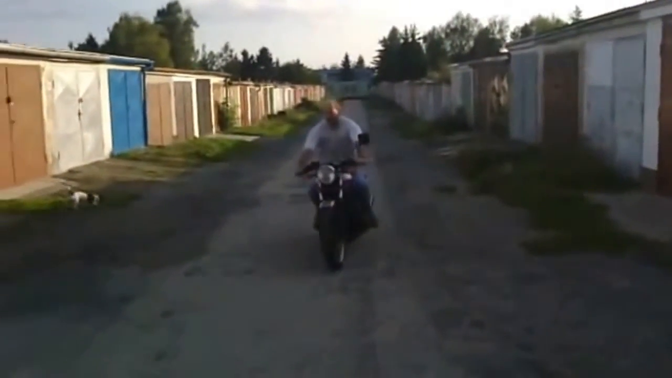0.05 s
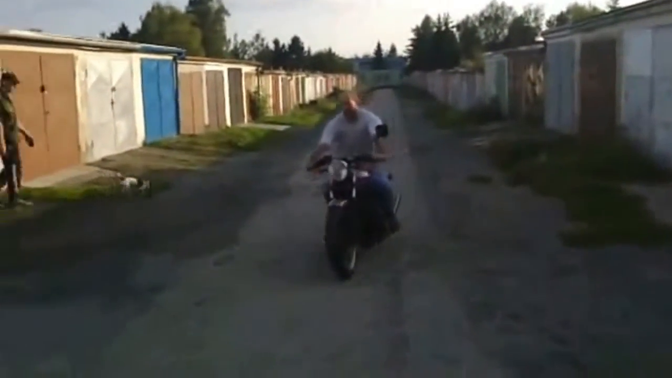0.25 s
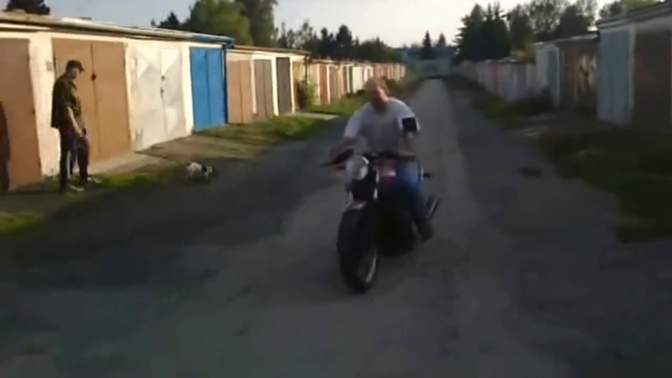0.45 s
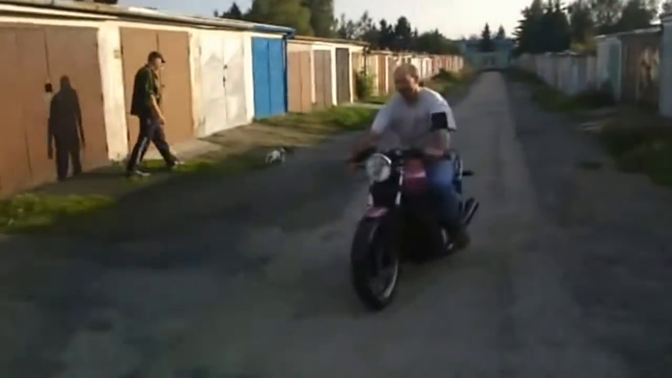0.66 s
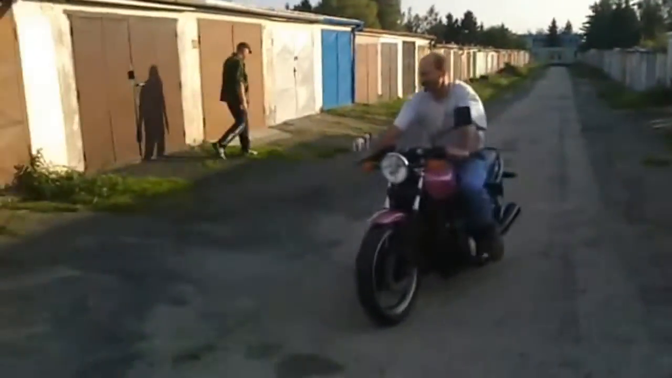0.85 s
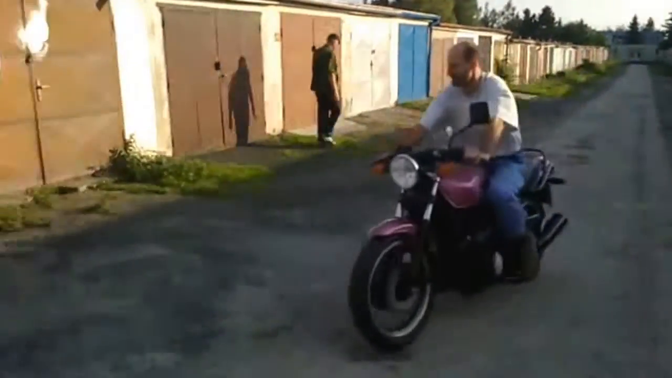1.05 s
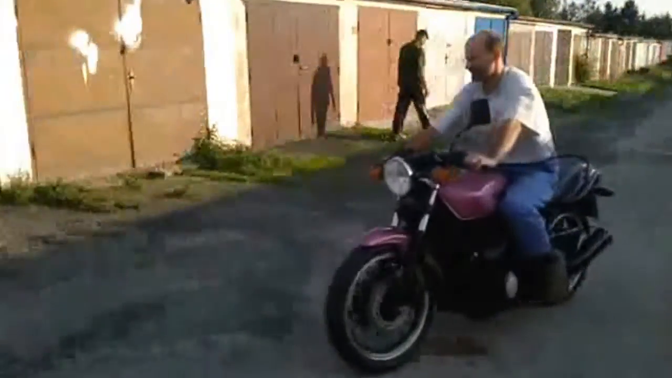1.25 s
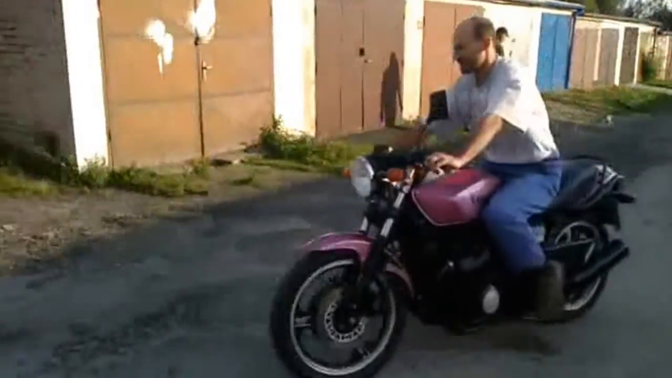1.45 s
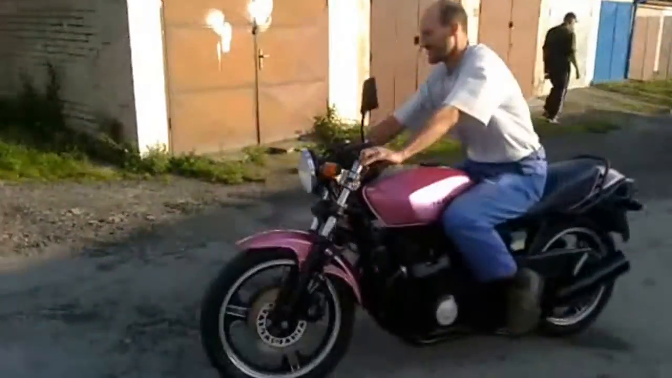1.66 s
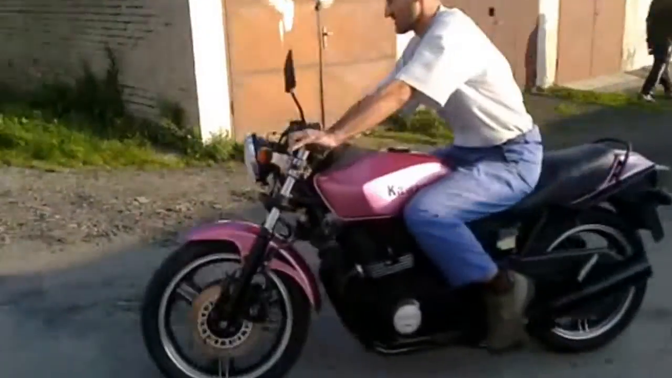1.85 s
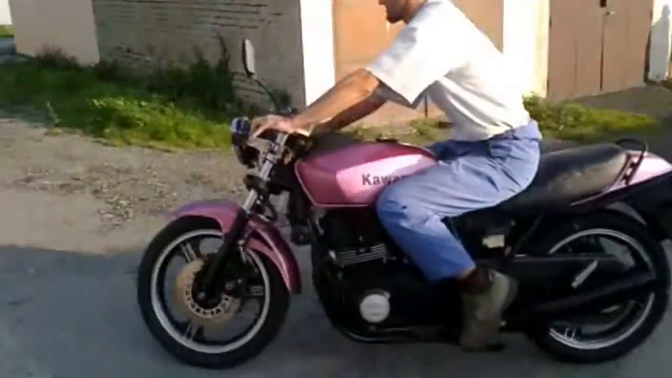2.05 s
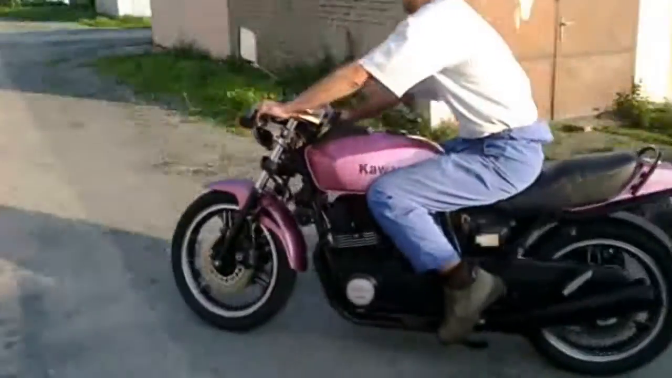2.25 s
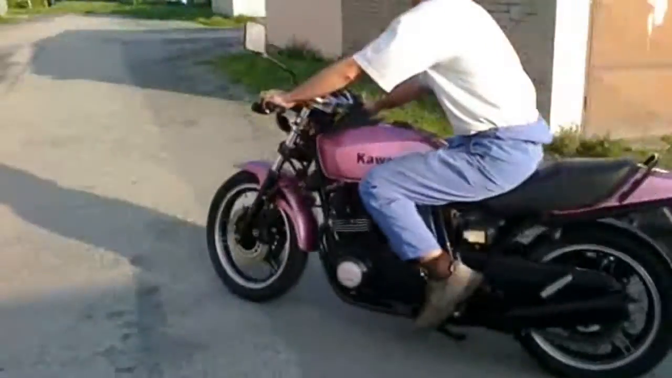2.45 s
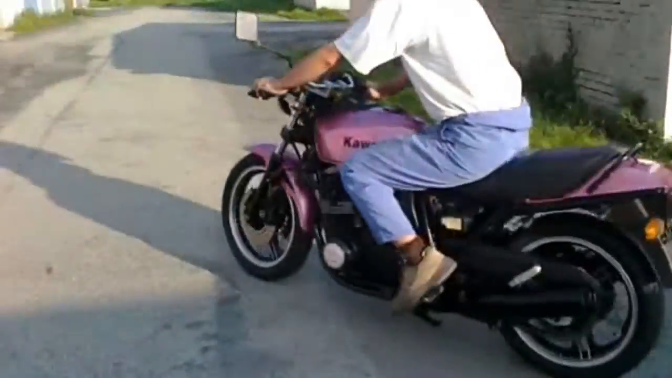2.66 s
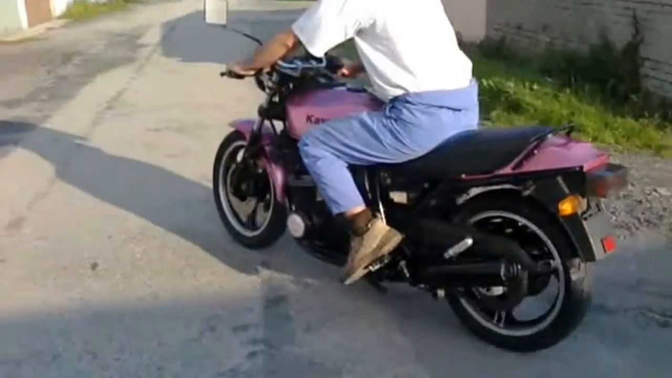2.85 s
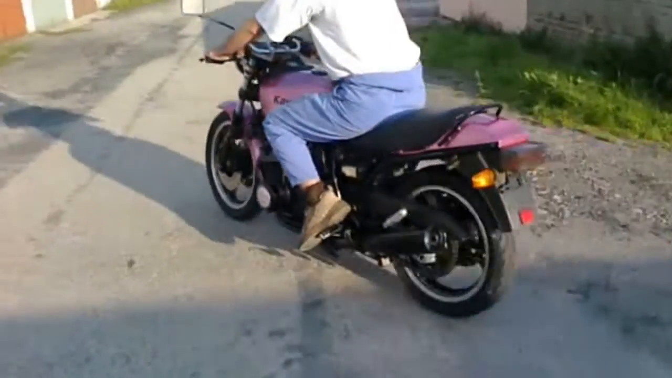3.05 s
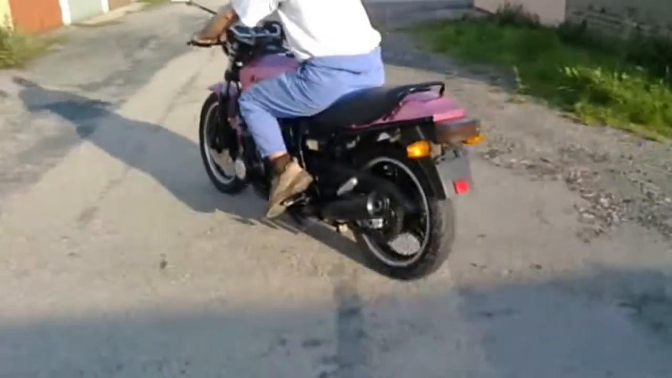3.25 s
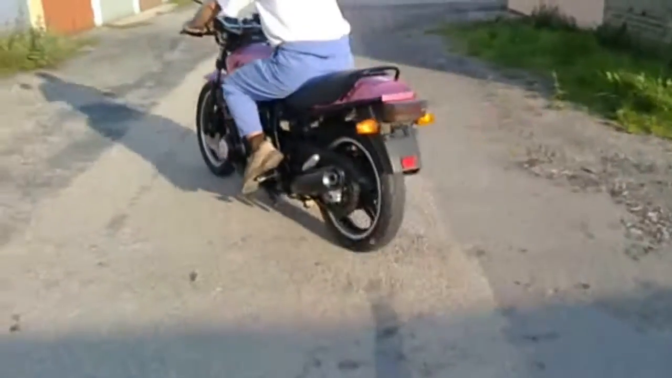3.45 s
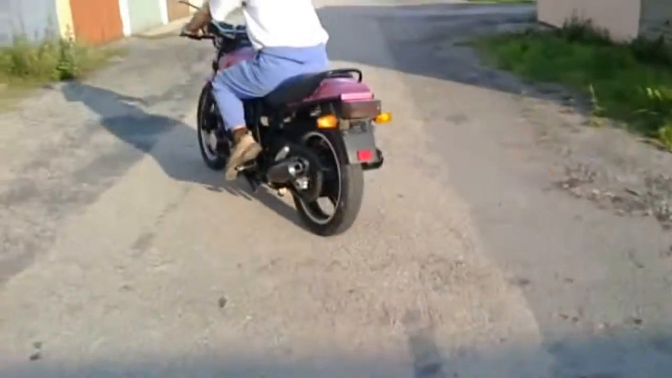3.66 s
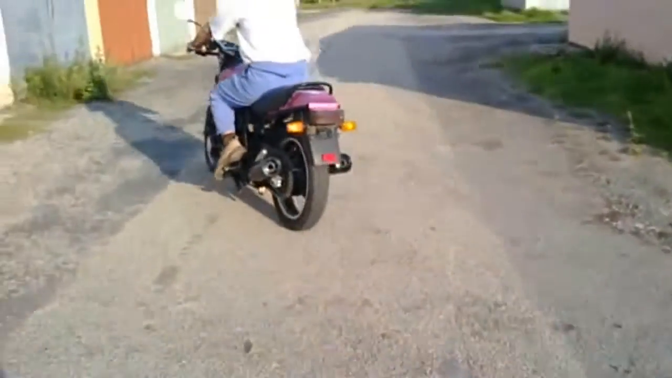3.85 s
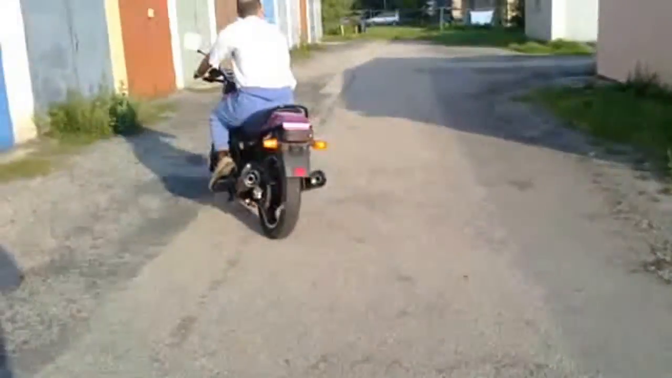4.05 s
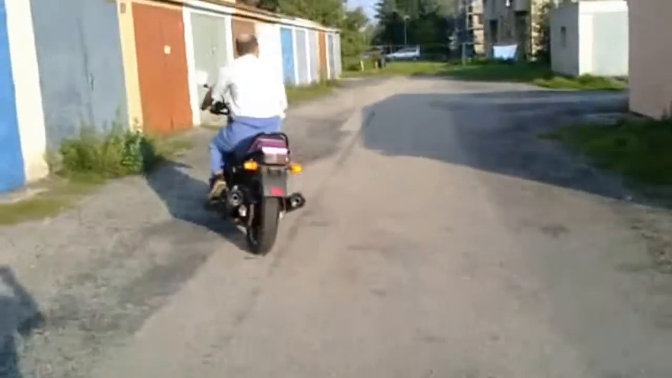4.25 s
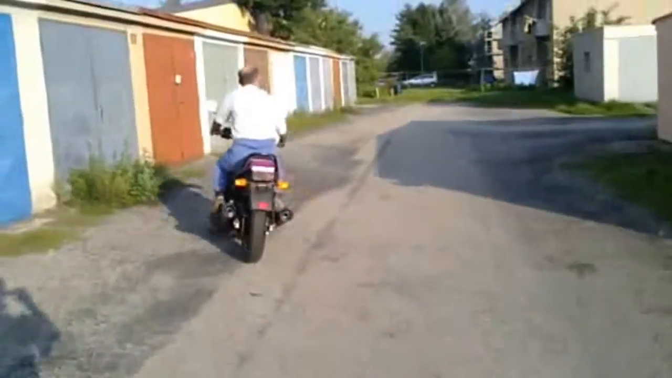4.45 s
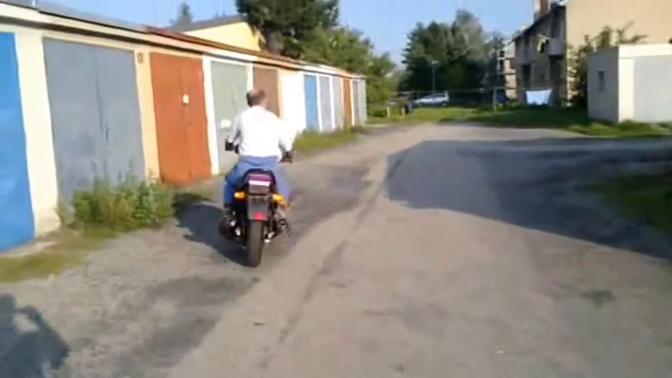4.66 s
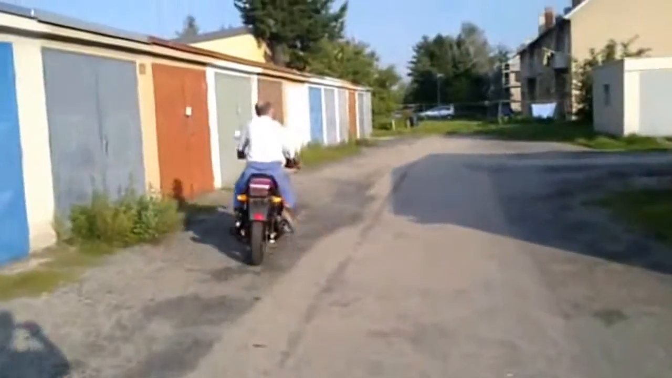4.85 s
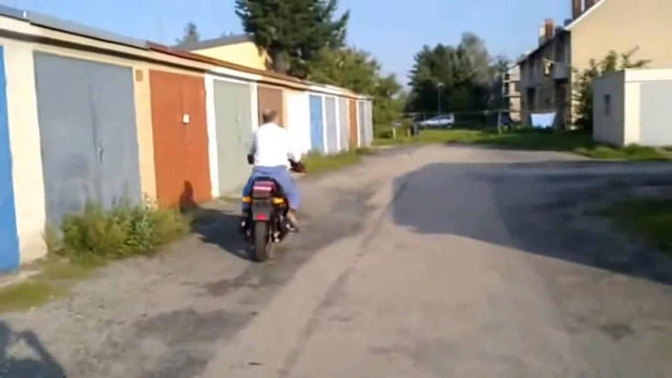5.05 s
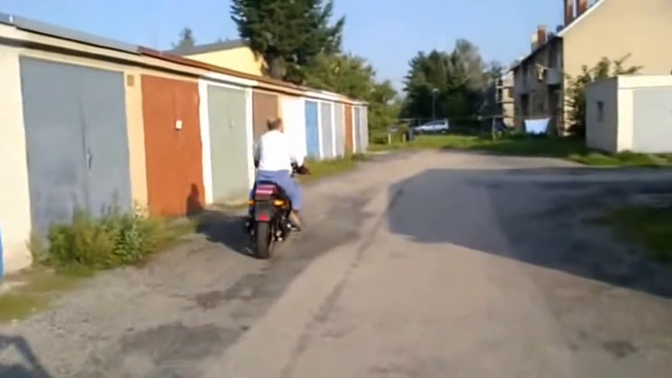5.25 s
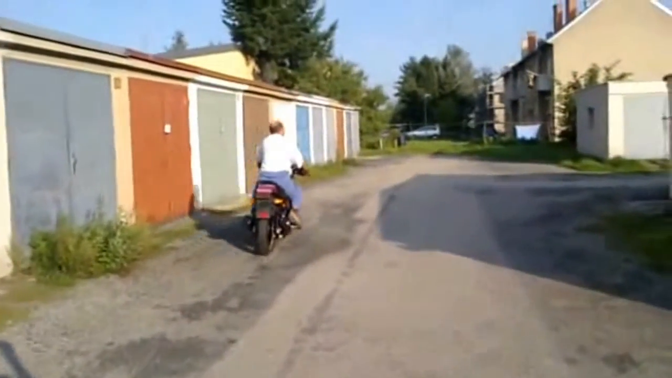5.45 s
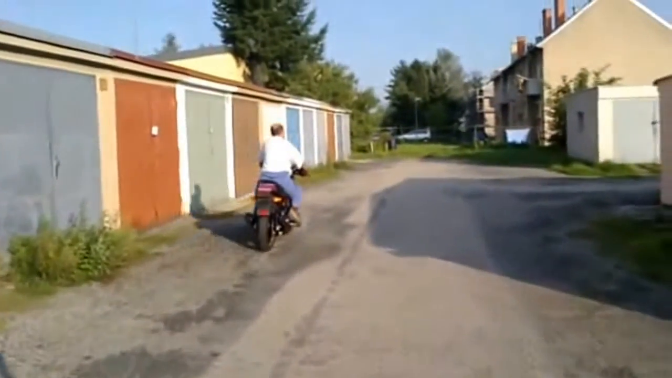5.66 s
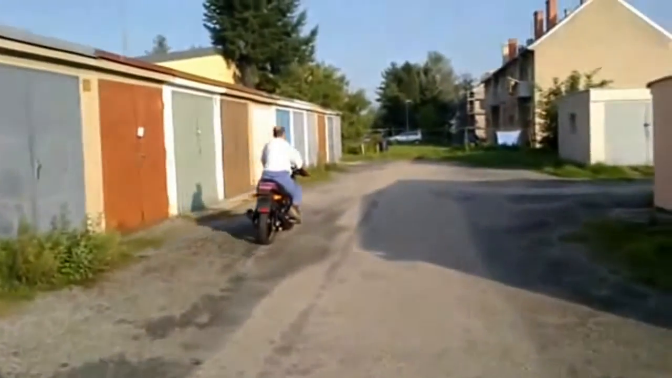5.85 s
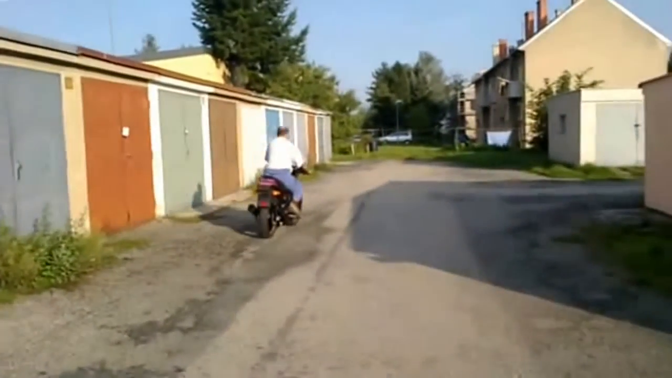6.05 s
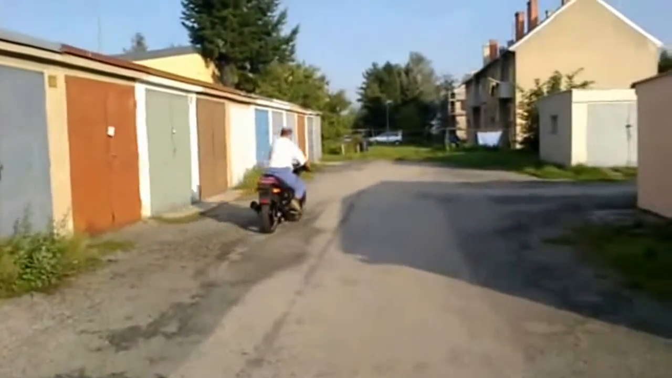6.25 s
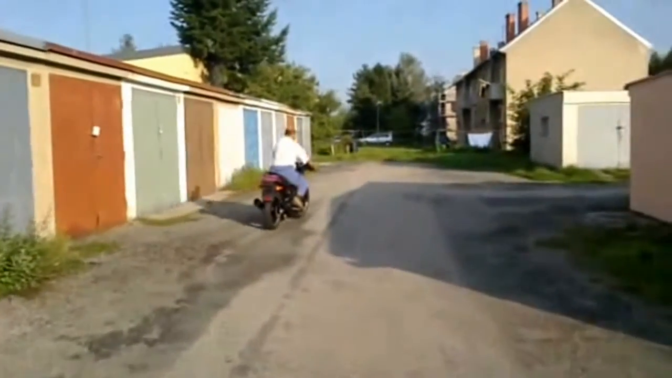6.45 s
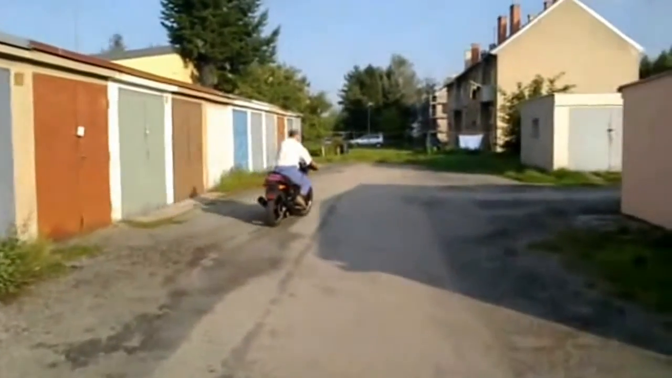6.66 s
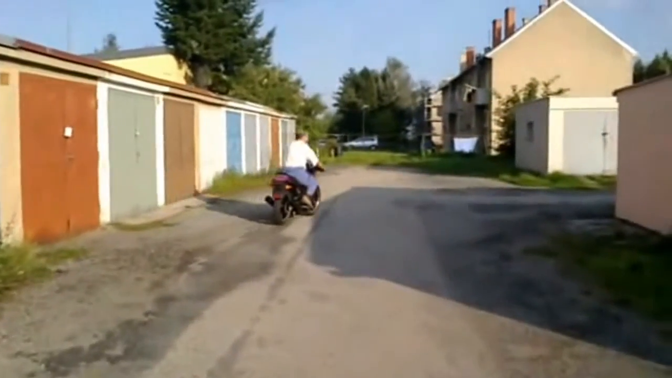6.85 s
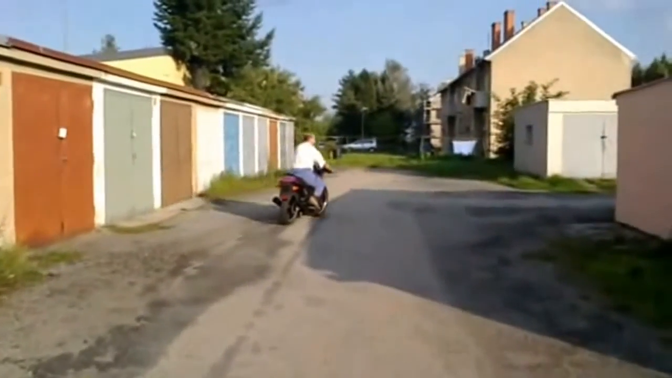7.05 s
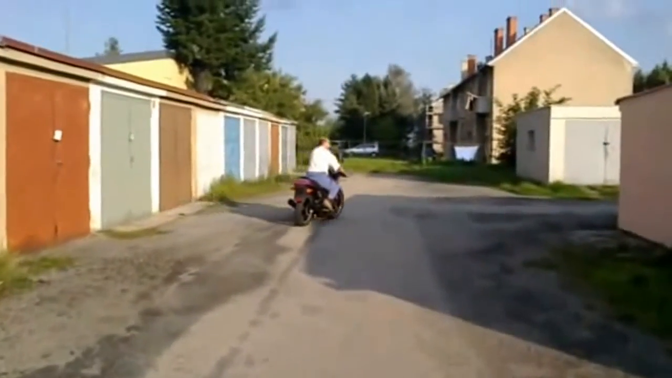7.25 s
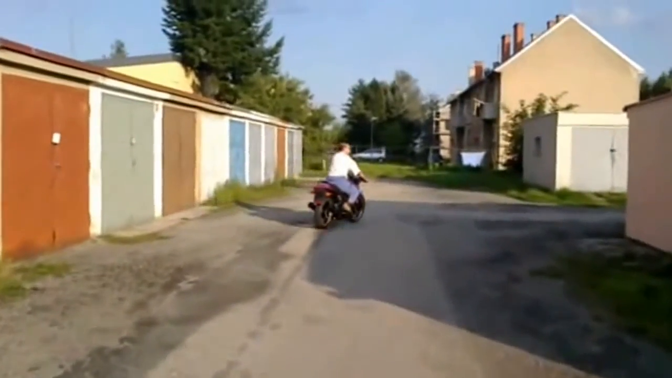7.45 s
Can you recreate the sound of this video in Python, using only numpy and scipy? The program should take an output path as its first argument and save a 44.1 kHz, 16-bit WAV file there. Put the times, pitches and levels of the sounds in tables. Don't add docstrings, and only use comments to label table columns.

```python
import sys
import numpy as np
from scipy import signal
from scipy.io import wavfile
from scipy.ndimage import uniform_filter1d

SR = 44100
rng = np.random.default_rng(int(sys.argv[2]) if len(sys.argv) > 2 else 0)


def file_out(sig):
    cols = np.atleast_2d(sig).T
    lim = np.clip(cols, -1, 1)
    pcm = np.round(lim * 32767).astype(np.int16)
    wavfile.write(sys.argv[1], SR, pcm)


def decibels_to_gain(level_db):
    exponent = np.asarray(level_db, float) / 20
    return 10 ** exponent


N = 331191

# frequency in Hz, level in dB per Hz.
AIR_SPECTRUM = [(160, -33), (280, 11), (413, -25), (1030, -31), (2050, -21), (3230, -12), (4600, -24),
                (9330, -25.5), (15700, -45)]
# time in seconds, level in dB, width in seconds.
CRUNCHES = [(.51, -33.5, 0.039), (1.2, -35, 0.011), (1.27, -40, 0.084), (1.392, -27, 0.011),
            (4.57, -56, 0.038), (4.71, -40.5, 0.037), (4.77, -30, 0.016), (4.94, -38.5, 0.0095),
            (5.01, -45, 0.036), (5.08, -42.5, 0.021), (5.25, -43.5, 0.066), (5.43, -48, 0.019),
            (5.581, -39, 0.022), (5.649, -49, 0.044), (5.82, -35, 0.02), (5.87, -45.5, 0.029),
            (6.3, -38, 0.056), (6.49, -52, .03), (6.7, -55.5, 0.028), (7.4, -58, 0.018)]
# frequency in Hz, level in dB per Hz.
GRIT_SPECTRUM = [(600, -23), (1200, 3.5), (2400, 3), (3600, 5), (5200, 3.5), (8000, -9), (10500, -22),
                 (15700, -37)]
# time in seconds, peak in dB, pitch in Hz.
STONE_SNAPS = [(0.228, -15, 3240), (0.9434, -16, 3754), (1.2692, -9, 1780), (2.8802, -21.5, 2470),
               (3.411, -18, 2280), (4.3674, -24, 3266), (5.0892, -22, 2920), (5.5655, -26, 4230),
               (5.8047, -24, 3500), (5.815, -19, 3132), (5.824, -19, 2620), (5.838, -27, 2514),
               (5.847, -9, 3400), (5.8478, -12.5, 1490), (5.856, -20, 1887), (5.8699, -34, 2346),
               (5.896, -21, 1590), (6.0204, -20, 3416), (6.2114, -35, 1502), (6.6956, -35, 2208)]
# start in seconds, end in seconds, first frequency in Hz, last frequency in Hz, lift in dB.
ECHO_BANDS = [(.5, 2.56, 990, 1420, -8), (-2, 1.7, 4060, 4300, -5), (3, 5.9, 2420, 2900, -9),
              (0.5, 2.96, 2950, 3620, 4.5), (6.6, 7.5, 7500, 7450, 4), (3, 3.2, 3600, 2830, 4),
              (0, 1.2, 5600, 6450, 2), (4.7, 2.4, 1400, 1440, -0.5), (2.5, 4.8, 4200, 4000, -7)]
# time in seconds, share of treble lost from 0 to 1.
FAR = [(0, .6), (1.2, 0), (2.55, .05), (2.8, .88), (5.7, .9), (6.1, .99), (7.51, .99)]
# time in seconds, then the dB reaching the listener
REACH = [(0, -5, -3.5, -2), (.4, 4.5, 3.5, 2), (.75, 2.5, 1.5, 4.5), (1.15, 0, 1.5, -10), (1.45, 7, 7, 7),
         (1.75, 0, 4, -13), (2.25, 1.5, 5.5, 7), (2.75, 0.5, 3, 2.5), (3, 4, 3.5, 2), (3.3, 3, 0.5, -3),
         (4.2, 0, 0, 1.5), (4.6, -5, -4, -4), (5.15, -1.5, 0.5, 4.5), (5.45, -0.5, 4, 5), (5.8, 3, -7.5, 4),
         (6.3, -0.5, -16, 4), (6.8, -2.5, -23, -4), (7.51, -2, -24, 3)]
# time in seconds, dB on the bark.
MOUTH = [(0, 12), (.2, 1.5), (.5, 12), (.7, 1.5), (1.3, 3), (1.95, 7.5), (2.3, 4.5), (2.8, -8), (3.3, -2.5),
         (4.1, 2.5), (4.6, 3.5), (5.5, -4.5), (6.1, -5), (6.3, 1.5), (6.6, 4.5), (7.1, -2.5), (7.51, 2.5)]

# time in seconds, peak in dB, pitch in Hz.
KNOCKS = [(0.5083, -3.5, 5550), (0.564, -4.5, 5200), (0.826, -9.5, 3700), (1.195, -5.5, 2540),
          (1.3778, -5, 2070), (1.4527, 1.5, 3000), (1.7469, -12, 3300), (1.965, -14, 2020),
          (2.114, -2.5, 3650), (3.0077, -4, 1614), (3.497, -11.5, 1740), (3.5784, -11, 4800),
          (3.652, -10, 1780), (3.701, -13, 5006), (3.7688, -9.5, 5530), (3.9829, -7, 5150),
          (3.8355, -18, 2026), (3.852, -11, 5300), (3.969, -8, 5290), (4.0827, -13, 3150),
          (4.3657, -13, 1730), (4.366, -8, 3290), (2.879, -11, 1510), (4.76, -7, 2460), (4.7681, -10, 4900),
          (4.4755, -17, 3582), (4.9341, -17, 2495), (5.591, -8.5, 1770), (5.645, -11.5, 1800),
          (5.875, -16, 1746), (5.0718, -13, 5384)]
# time in seconds, peak in dB,
# pitch in Hz.
TICKS = [(0.226, -30, 6800), (0.4853, -35, 6680), (0.5069, -18, 8640), (0.5632, -19.5, 8400),
         (0.7337, -31, 8160), (0.9423, -29, 7180), (1.1423, -36, 6880), (1.1792, -32, 6880),
         (1.1923, -25.5, 7000), (1.268, -27, 9680), (1.4037, -27, 7540), (1.4202, -23, 9570),
         (1.453, -21, 6560), (1.4646, -22.5, 11700), (1.5165, -27, 6890), (1.5599, -31, 14500),
         (1.6152, -38, 8370), (1.9056, -26, 6510), (1.9671, -31, 6610), (2.1151, -34, 6570),
         (2.13, -24, 6900), (2.186, -21, 9850), (2.2293, -22, 7690), (2.5864, -41, 6540),
         (2.8519, -36, 8020), (2.9098, -38, 6610), (2.9282, -30, 6700), (3.025, -23, 6500),
         (3.1086, -29, 8800), (3.1862, -40, 8800), (3.262, -29, 7030), (3.2814, -32, 7340),
         (3.3248, -27, 7580), (3.4206, -24, 7610), (3.4401, -31, 7140), (3.4615, -31, 6630),
         (3.5004, -25, 7110), (3.5783, -28, 7900), (3.6501, -25.5, 7830), (3.702, -32, 7750),
         (3.7189, -28, 7740), (3.918, -24, 7800), (4.2128, -29, 7230), (4.2966, -28, 7380),
         (4.4545, -37, 7530), (4.5271, -32, 7565), (4.7596, -24, 7365), (5.0728, -28, 7115),
         (5.3363, -27, 7350), (5.4319, -33, 6494), (5.5633, -23, 6500), (5.5779, -25, 7740),
         (5.8456, -42, 6685), (6.334, -30, 6810),
         (0.523, -22, 9010), (0.5734, -21, 6930), (0.607, -30, 6890), (0.828, -23.5, 6500),
         (4.7683, -34, 7040), (5.0076, -38, 7880), (5.015, -39, 7490), (6.9839, -51, 9580),
         (7.0243, -50, 9550), (7.1769, -51, 7170), (7.3031, -53, 9420)]
# time in
# seconds, pitch in Hz, level in dB.
SQUEALS = [
    [(1.46, 990, -51), (1.52, 990, -63), (1.6, 990, -48.5), (2.05, 1006, -49), (2.5, 960, -34.5),
     (2.56, 970, -10)],
    [(1.47, 1950, -46), (1.525, 1960, -33.5), (1.58, 1925, -52)],
    [(.52, 464, -40), (.6, 480, -30.5), (.68, 480, -51)],
    [(6.2, 3416, -41), (6.27, 3442, -39), (6.48, 3396, -47.5), (6.6, 3420, -61), (6.72, 3480, -58.5),
     (6.95, 3322, -72)],
    [(2.36, 1900, -42), (2.42, 1950, -35), (2.54, 1850, -35)],
    [(3.2, 624.4, -40), (3.45, 592, -46), (4, 868, -54), (4.28, 976, -44.5), (4.36, 961, -50)],
    [(2.9, 1570, -34.5), (3.03, 1620, -37.5), (3.3, 1680, -43), (3.7, 1800, -43.5)],
    [(2.28, 2660, -32), (2.41, 2600, -29.5), (2.46, 2590, -38)],
    [(2.34, 3600, -46), (2.4, 3580, -32), (2.47, 3522, -38)],
    [(2.14, 560.5, -39), (2.25, 658.8, -35), (2.33, 730, -41), (2.4, 704, -49)],
    [(2.56, 1780, -48), (2.62, 1589, -43), (2.69, 1320, -43)],
]
SQUEAL_WIDTHS = [49, 9, 160, 550, 200, 40, 150, 90, 90, 70, 30]
# time in seconds, pitch in Hz, level in dB.
CAM_CHAIN = [(2.8, 4596, -78), (2.95, 4600, -45), (3.1, 4680, -45), (3.6, 4830, -46), (3.75, 5150, -39.5),
             (4, 5400, -49), (4.3, 5040, -43), (4.4, 4990, -90)]
# multiple of the firing rate, dB against the clatter,
# dB per octave of engine speed.
WHINES = [(6, -17, 11), (11.5, -12, 0), (12, -10.5, 2), (14.75, -14, 0), (24, -10.5, 8)]
# frequency in Hz, level in dB per Hz.
CLATTER_SPECTRUM = [(590, -2), (1000, -4.5), (1140, -4), (1900, 6), (2210, 1), (3470, 1.5), (4020, 1),
                    (5310, 4), (8000, -11), (10400, -58), (17600, -120)]
# frequency in Hz, width in Hz, lift in dB.
CASE_RINGS = [(1780, 88, 2), (2800, 710, -0.5), (3680, 180, 3), (5150, 53, -5)]
# frequency in Hz, level in dB per Hz.
ROAR_SPECTRUM = [(180, -12.5), (300, -12), (414, -23.5), (646, -9.5), (881, -17.5), (995, -12), (1140, -17),
                 (1500, -19.5), (1950, -25), (3300, -120)]
# frequency in Hz, level in dB per Hz.
HISS_SPECTRUM = [(3530, -107), (6000, -9.5), (7890, -9.5), (9500, -9), (10900, -13), (14500, -11.5),
                 (15700, -20)]
# time in seconds, change in dB, width in seconds.
LULLS = [(.43, -4.5, 0.03), (.87, -3, 0.012), (1.1, -2, 0.046), (2.75, -3.5, 0.12), (4.62, -3.5, 0.018),
         (4.68, -7, .012), (4.87, -1, 0.027), (4.97, -0.5, .012), (5.19, -7, 0.028), (5.4, -4.5, 0.028),
         (5.54, -5.5, .012), (5.72, 2.5, 0.022), (6.12, -0.5, 0.031)]

# time in seconds, firings per second.
SPEED = [(0, 61.56), (.28, 48.7), (1.32, 37.2), (1.8, 48.14), (1.92, 52.05), (2.07, 50.97), (2.84, 39.55),
         (3.27, 52.32), (3.5, 50.45), (3.71, 58.67), (4.1, 62.7), (4.2, 59), (4.3, 66.3), (4.5, 52.2),
         (4.95, 38.88), (5.3, 37.01), (6.1, 35.43), (7.51, 37.5)]
# start in seconds, crest in seconds,
# added firings per second, fall time in seconds, bend of the rise.
BLIPS = [
    (.46, 0.647, 52.7, .27, 1.005),
    (1.33, 1.543, 39.88, .16, 1.01),
    (2.1, 2.37, 75.41, .23, 1.7),
    (6.201, 6.36, 57.06, 0.3, 0.97),
]
# opens in seconds, shuts in seconds, opening from 0 to 1.
THROTTLE = [
    (-.1, 0.009, 0.37),
    (0.471, 0.608, 0.31),
    (1.36, 1.447, 0.21),
    (1.863, 1.96, 0.24),
    (2.089, 2.384, 0.48),
    (2.884, 4.286, 0.24),
    (6.206, 6.364, 0.76),
]
# strength in dB, lateness in firings.
CYLINDERS = [(0, 0), (-2, .015), (-.7, -.012), (-3.5, .008)]
# dB at 60 firings a second,
# dB per octave of engine speed, dB added by full throttle.
LAWS = [(-26, 6, 17.5), (-35.5, 9.5, 11), (-39.5, 5.5, 10.5), (-43, 1, 9.5)]
# frequency in Hz, level in dB.
FIRST_ORDER = [(33, -39), (50, -28), (62, -25.5), (85, -21), (100, -19), (123, -17.5)]
# frequency in Hz, level in dB.
SECOND_ORDER = [(70, -19), (90, -19), (110, -15), (128, -19), (170, -29), (200, -44), (246, -9)]
# time in seconds, change in
# dB, width in seconds.
STUMBLES = [(.42, -11, 0.11), (.6, -7, 0.017), (0.725, -11, 0.017), (1.7, -4.5, 0.012), (2.485, 2, 0.0077),
            (4.68, -2, 0.025), (4.87, -6, 0.026), (5.42, -3, 0.032), (6.63, -3.5, 0.021), (6.86, -5, 0.022),
            (1.55, -7, 0.027), (2.39, -9, 0.015), (2.75, -8, 0.05), (4.55, -2, 0.17), (6.09, -5, 0.018),
            (6.44, -7, 0.015), (7.05, -6, 0.029)]
# frequency in Hz, width in Hz, level in dB.
PIPE = [(150, 14.7, 3), (201, 34, -0.5), (254, 40, 2.5), (301.2, 42, -4), (362, 96, -21.5), (522, 110, -24)]
# frequency in Hz, width in Hz, level in dB.
GROWL = [(480, 89, 14), (663, 160, -6), (957, 85, 8.5), (1800, 340, -3), (2820, 830, -31)]
# frequency in Hz, width in Hz.
SILENCER = (101.3, 27)
# crest in seconds, peak in dB, width in seconds.
THROBS = [(0.276, -21.5, 0.091), (.777, -19, 0.12), (1.139, -18, 0.041), (1.196, -18, 0.027),
          (1.288, -17, 0.034), (1.609, -12, 0.045), (1.734, -20, 0.046), (1.805, -15, 0.024),
          (2.719, -16, 0.017), (2.8, -20.5, 0.047), (4.476, -15, .024), (4.597, -17, 0.079),
          (4.733, -19.5, 0.058), (4.817, -19, 0.027), (4.914, -19, 0.036), (5.019, -19.5, 0.021),
          (5.146, -22, 0.042), (5.28, -19.5, 0.053), (5.35, -20.5, 0.042), (5.61, -25.5, 0.04),
          (5.761, -27, 0.17), (6.011, -17.5, 0.038), (6.172, -22.5, 0.082), (6.593, -21, 0.029),
          (6.721, -20, 0.097), (6.808, -21, 0.078), (6.914, -21, 0.07), (7.178, -17.5, 0.056),
          (7.263, -18, 0.024), (7.395, -18, 0.058)]
THROB_TONES = [99.0, 77, 103, 102.5, 102.5, 78.0, 109, 104.0, 99, 86.0, 99.9, 100.9, 95, 100.2, 111.5,
               110.2, 109.0, 108, 112.0, 103.0, 92.0, 93.0, 99.8, 89.9, 104.5, 93.2, 94.0, 98.0, 106.4,
               104.0]
# time in seconds, peak in dB.
SHORT_THROBS = [(0.152, -15), (0.396, -23), (0.562, -13), (0.959, -20), (2.601, -24.5), (2.893, -23),
                (5.446, -26), (5.879, -28), (5.936, -28), (7.003, -25.5), (7.086, -20)]


def smoothed(x, size):
    return uniform_filter1d(uniform_filter1d(x, size), size)


def evened(x, size=None):
    power = np.mean(x ** 2) if size is None else smoothed(x ** 2, size)
    return x / np.sqrt(abs(power) + 1e-20)


def curves(rows):
    s, *columns = np.transpose(rows)
    return [np.interp(np.arange(N) / SR, s, c) for c in columns]


def read(points, hz):
    f, db = np.transpose(points)
    return np.interp(np.log(hz), np.log(f), db)


def bumps_of(rows):
    t = np.arange(0, N + 32, 32) / SR
    total = sum(height * np.exp(-((t - s) / width) ** 2) for s, height, width in rows)
    return np.interp(np.arange(N) / SR, t, total)


def resonate(x, hz, *widths):
    turn = np.exp(2j * np.pi * np.cumsum(hz * np.ones(len(x))) / SR)
    low = x * turn.conj()
    for width in widths:
        r = np.exp(-np.pi * width / SR)
        low = signal.lfilter([1 - r], [1, -r], low)
    return 2 * (turn * low).real


def dulled(x, hz, share):
    low = signal.sosfiltfilt(signal.butter(3, hz, fs=SR, output="sos"), x)
    return evened((1 - share) * x + share * low, size=6000)


def noise(spectrum, patchy_db, bumps=(), drifts=()):
    frames, hz = N // 128 + 5, np.fft.rfftfreq(512, 1 / SR)
    a, b, patches, streaks = rng.standard_normal((frames, 257, 4), dtype=np.float32).T
    patches = evened(uniform_filter1d(uniform_filter1d(patches, size=6, axis=0), size=14, axis=1))
    streaks = evened(uniform_filter1d(uniform_filter1d(streaks, size=2, axis=0), size=90, axis=1))
    f, db = np.transpose(spectrum)
    shape = np.interp(np.log(hz + 1), np.log(f), db, left=-90, right=-90)
    for at, width, lift_db in bumps:
        shape = shape + lift_db / (1 + (2 * (hz - at) / width) ** 2)
    field = shape[:, None] + patchy_db * patches + 1.6 * streaks
    t = np.arange(frames) * 128 / SR
    for start, end, from_hz, to_hz, lift_db in drifts:
        u = (t - start) / (end - start)
        on = (u > 0) & (u < 1)
        fade = np.minimum(1, 10 * np.minimum(u[on], 1 - u[on]))
        center = from_hz + (to_hz - from_hz) * u[on]
        band = np.exp(-(2 * (hz[:100, None] - center) / 230) ** 2)
        field[:100, on] += lift_db * fade * band
    return evened(signal.istft((a + 1j * b) * decibels_to_gain(field), nperseg=512, noverlap=384)[1][:N])


def still_air():
    return decibels_to_gain(-56) * noise(AIR_SPECTRUM, 1.2)


def lane_echo(x):
    taps, at = np.zeros(SR // 2), np.arange(500, SR // 2 - 40, 40)
    taps[at + rng.integers(0, 40, len(at))] = rng.choice([-1., 1.], len(at)) * decibels_to_gain(-60 * at / SR / 0.21)
    return signal.oaconvolve(x, taps / np.linalg.norm(taps))[:N]


def gravel():
    t = np.arange(600) / SR
    swell = bumps_of([(s, decibels_to_gain(db), width) for s, db, width in CRUNCHES])
    grains = decibels_to_gain(4.7 * np.minimum(rng.exponential(1, N), 4)) * (rng.random(N) < 300 / SR)
    crunch = evened(1.7 + signal.oaconvolve(grains, np.exp(-t / 0.003))[:N])
    return swell * crunch * noise(GRIT_SPECTRUM, 0.49)


def stone_snaps():
    out, t = np.zeros(N + 1000), np.arange(1000) / SR
    for (s, db, hz), rattle in zip(STONE_SNAPS, rng.standard_normal((len(STONE_SNAPS), 1000))):
        near = 1 - np.interp(s, *np.transpose(FAR))
        snap = np.sin(2 * np.pi * hz * (t - .0003)) * np.exp(-((t - .00035) * hz / .62) ** 2)
        after = evened(resonate(resonate(rattle, 1.15 * hz, 2400), 1.15 * hz, 2400))
        after = after * np.exp(-t / 0.0014) * (1 - np.exp(-(t / 0.00041) ** 2))
        edge = near * rattle * np.exp(-t / 0.00047)
        out[int(s * SR) - 6:][:1000] += decibels_to_gain(db + 1.0) * (snap + 0.14 * after + 0.16 * edge)
    return out[:N]


def squeals():
    out = np.zeros(N)
    for rows, width in zip(SQUEALS, SQUEAL_WIDTHS):
        s, hz, db = np.transpose(rows)
        t = np.arange(s[0], s[-1], 1 / SR)
        pitch = np.interp(t, s, hz)
        whistle = evened(resonate(resonate(rng.standard_normal(len(t)), pitch, width), pitch, 2 * width))
        fade = signal.windows.tukey(len(t), .2)
        out[int(s[0] * SR):][:len(t)] += decibels_to_gain(np.interp(t, s, db)) * whistle * fade
    return out


def knocks():
    out, t = np.zeros(N + 1000), np.arange(1000) / SR
    for (s, db, hz), rattle in zip(KNOCKS, rng.standard_normal((len(KNOCKS), 1000))):
        fuzzy = evened(resonate(resonate(rattle, hz, 660), hz, 660))
        ring = 0.6 * fuzzy + 1.1 * np.sin(2 * np.pi * hz * t)
        out[int(s * SR):][:1000] += decibels_to_gain(db - 18.0) * ring * (1 - np.exp(-t / 0.00074)) * np.exp(-t / 0.0061)
    return out[:N]


def bright_ticks():
    out, t = np.zeros(N + 600), np.arange(600) / SR
    rows = TICKS
    for (s, db, hz), spit in zip(rows, rng.standard_normal((len(rows), 600))):
        near = 1 - np.interp(s, *np.transpose(FAR))
        width = 3700 * (0.7 + 0.41 * near)
        core = evened(resonate(spit, hz, width, width, 2 * width))
        bright = core + 1.5 * near ** 1.6 * evened(np.diff(spit, prepend=0))
        out[int(s * SR):][:600] += decibels_to_gain(db - 6) * bright * (1 - np.exp(-t / .0003)) * np.exp(-t / 0.0032)
    return out[:N]


def firings(turns, jitter, spread_db):
    count = np.arange(1, int(turns[-1]))
    chance = np.clip(rng.standard_normal((len(count), 2)), -1.7, 1.7)
    db, late = np.transpose(CYLINDERS)[:, count % len(CYLINDERS)]
    at = np.interp(count + late + jitter * chance[:, 0], turns, np.arange(N)).astype(int)
    return np.bincount(at, decibels_to_gain(db + spread_db * chance[:, 1]), N)


def valve_ticks(turns):
    t = np.arange(900) / SR
    tick = (1 - np.exp(-t / .001)) * np.exp(-t / .0035)
    ticks = firings(turns + .3, .04, 3.5) + .35 * firings(turns + .8, .05, 2.5)
    grit = decibels_to_gain(1.5 * np.minimum(rng.exponential(1, N), 3)) * (rng.random(N) < 150 / SR)
    return ticks, evened(0.56 + signal.oaconvolve(ticks + 0.55 * grit, tick)[:N], size=6000)


def case_clatter(gate, far):
    metal = noise(CLATTER_SPECTRUM, 1.2, CASE_RINGS, ECHO_BANDS)
    valves = signal.sosfilt(signal.butter(4, 3000, "high", fs=SR, output="sos"), metal)
    cases = signal.sosfilt(signal.butter(4, 3000, fs=SR, output="sos"), metal)
    valves = dulled(valves, 4300, np.clip(10 * (far - .9), 0, 1))
    return evened(gate + 1.1, size=6000) * evened(cases) + decibels_to_gain(-2) * gate * valves


def intake_roar(turns, gate):
    breath = evened(1 + 0.038 * np.cos(2 * np.pi * turns) + gate, size=6000)
    return breath * noise(ROAR_SPECTRUM, 1.8, (), ECHO_BANDS)


def engine_hiss(ticks, gate, firm, far):
    t = np.arange(900) / SR
    spit = evened(signal.oaconvolve(ticks ** 2, np.exp(-t / .0015))[:N], size=6000)
    pulse = evened(gate + (0.047 + 0.13 * firm) * spit + 0.5 * far ** 4, size=6000)
    lost = np.clip(np.minimum(far, .93) - 0.21 * firm, 0, 1)
    return pulse * dulled(noise(HISS_SPECTRUM, 1.54), 10400, lost)


def gear_whine(hz, turns, firm):
    drift, flutter = (evened(uniform_filter1d(v, size=1500)) for v in rng.standard_normal((2, N)))
    mesh = np.zeros(N)
    for multiple, db, slope_db in WHINES:
        tone = np.sin(2 * np.pi * multiple * (turns + .003 * drift))
        mesh += decibels_to_gain(db + slope_db * np.log2(hz / 60)) * tone
    return (.3 + .7 * firm) * decibels_to_gain(1.6 * flutter) * np.clip(hz / 60, 0, 1) ** 2 * mesh


def cam_chain(gate):
    chain_hz, chain_db = curves(CAM_CHAIN)
    ring = evened(resonate(rng.standard_normal(N), chain_hz, 420, 420))
    return decibels_to_gain(chain_db) * gate ** 2 * ring / 1.37


def works(hz, turns, firm, clatter_db, roar_db, hiss_db):
    (far,) = curves(FAR)
    ticks, gate = valve_ticks(turns)
    parts = case_clatter(gate, far) + decibels_to_gain(roar_db) * intake_roar(turns, gate)
    parts = parts + decibels_to_gain(hiss_db) * engine_hiss(ticks, gate, firm, far) + gear_whine(hz, turns, firm)
    return decibels_to_gain(clatter_db - 2.5) * parts + cam_chain(gate)


def rider():
    (hz,), t = curves(SPEED), np.arange(N) / SR
    for start, crest, added_hz, fall, bend in BLIPS:
        rise = 1 - (1 - np.clip((t - start) / (crest - start), 0, 1)) ** bend
        hz = hz + added_hz * rise * np.exp(-(np.maximum(t - crest, 0) / fall) ** 1.3)

    def opening(linger_s, open_s=0.026, shut_s=0.079):
        hands = []
        for opens, shuts, share in THROTTLE:
            ramp = np.minimum((t - opens) / open_s, 1 - (t - shuts - linger_s * share) / shut_s)
            hands.append(share * np.clip(ramp, 0, 1))
        return np.max(hands, axis=0)

    return uniform_filter1d(hz, size=1500), opening(0), opening(0.16)


def silencer():
    out, t = np.zeros(N), np.arange(N) / SR
    usual_hz, pipe_hz = 101.5, 258.8
    rows = THROBS + [(s, db, 0.022) for s, db in SHORT_THROBS]
    tones = list(THROB_TONES) + [usual_hz] * len(SHORT_THROBS)
    for (s, db, width), hz, phase in zip(rows, tones, rng.random(len(rows))):
        part = slice(max(int((s - 1.5 * width) * SR), 0), int((s + 3 * width) * SR))
        after = t[part] - s
        u = after / width
        swell = np.exp(-np.where(u < 0, 3.5, 2.2) * u ** 2)
        main = np.cos(2 * np.pi * (hz * after + phase))
        upper = decibels_to_gain(-18.5) * np.cos(2 * np.pi * (hz / usual_hz * pipe_hz * after + phase))
        out[part] += decibels_to_gain(db) * swell * (main + upper)
    return out


def growl(turns, load):
    pulses = firings(turns, .012, 2)
    ring = sum((-1) ** k * decibels_to_gain(db) * resonate(pulses, f, w, w) for k, (f, w, db) in enumerate(GROWL))
    return decibels_to_gain(-31.5 - 24.5 * (2 - load)) * evened(ring, size=3000)


def exhaust(hz, turns, uneven, tone_db, second_db, rumble_db, bark_db):
    lope = evened(smoothed(rng.standard_normal(N), 1800))
    slow = np.clip((80 - hz) / 20, 0, 1)
    tone_db = tone_db + slow * np.clip(7 * uneven - 1.5, 0, 1) * (4.5 * lope - 2)
    tones = -decibels_to_gain(tone_db) * np.cos(2 * np.pi * turns)
    tones = tones - decibels_to_gain(second_db) * np.cos(4 * np.pi * turns + np.pi / 12)
    steady = firings(turns, 0, 0)
    lumps = firings(turns, 0.079, 6.0) - steady
    rumble = evened(resonate(lumps, 57.1, 22.5, 22.5), size=5000)
    ring = evened(resonate(lumps, *SILENCER, SILENCER[1]), size=5000)
    wide = evened(resonate(lumps, 121.5, 30, 30), size=5000)
    low = decibels_to_gain(rumble_db) * (0.62 * rumble + 0.94 * ring + 0.35 * wide)
    drive = (1 - uneven) * steady + uneven * lumps
    bark = sum((-1) ** k * decibels_to_gain(db) * resonate(drive, f, w, 1.2 * w) for k, (f, w, db) in enumerate(PIPE))
    return np.sqrt(2) * tones + low + decibels_to_gain(bark_db) * evened(bark, size=3000)


def scene():
    hz, load, shake = rider()
    turns = np.cumsum(hz) / SR
    octaves = np.log2(hz / 60)
    tailpipe, cases, intake, mouth = curves(REACH) + curves(MOUTH)
    efforts = (load, load, shake, shake)
    rumble, bark, clatter, roar = (db + slope_db * octaves + open_db * effort
                                   for (db, slope_db, open_db), effort in zip(LAWS, efforts))
    firm = np.clip(load / 0.3, 0, 1)
    change = abs(uniform_filter1d(np.gradient(hz), size=4000)) * SR
    steady = firm * np.clip(2 - change / 130 * 2, 0, 1) ** .5
    revving = firm - steady
    first = read(FIRST_ORDER, hz) + 6 * firm + 10.5 * (shake - load)
    second = read(SECOND_ORDER, 2 * hz) - 16 * (1 - firm)
    rumble = rumble - 7 * np.clip((hz - 92) / 20, 0, 1) - 9 * steady - 9 * revving
    uneven = .37 - .17 * steady - .06 * revving - .14 * load
    pipe = exhaust(hz, turns, uneven, first, second, rumble, bark + mouth)
    hits = signal.sosfilt(signal.butter(2, 9000, fs=SR, output="sos"), knocks() + stone_snaps())
    hiss = -8.5 + 4.5 * shake - 2.5 * octaves
    engine = works(hz, turns, firm, clatter + cases, roar + intake - clatter - cases, hiss)
    bike = decibels_to_gain(tailpipe + bumps_of(STUMBLES)) * pipe + silencer() + growl(turns, load)
    bike = bike + decibels_to_gain(bumps_of(LULLS)) * engine + squeals() + gravel()
    return (bike + hits + bright_ticks() + decibels_to_gain(-9.0) * lane_echo(hits) + still_air())[None]


def roll_off(x):
    return signal.sosfilt(signal.butter(12, 15880, fs=SR, output="sos"), x)


def record(dry):
    rounded = .95 * np.tanh(dry / .95)
    thin = signal.sosfilt(signal.butter(2, 24, "high", fs=SR, output="sos"), rounded)
    mix = signal.oaconvolve(thin, signal.firwin(255, 15900, fs=SR)[None], "same")
    return roll_off(mix)


dry = scene()
out = record(dry)
file_out(out)
```